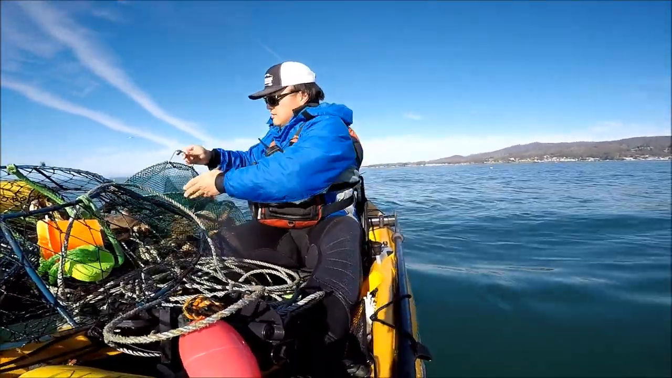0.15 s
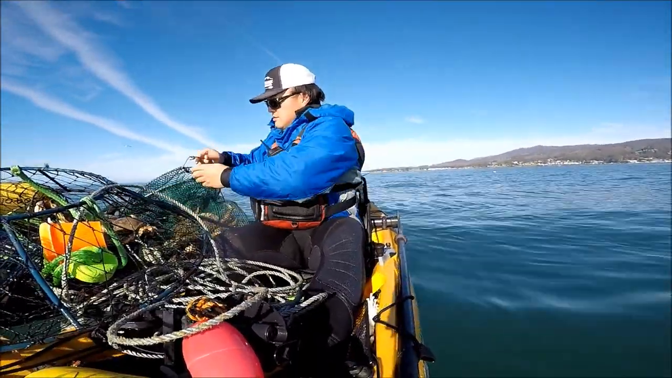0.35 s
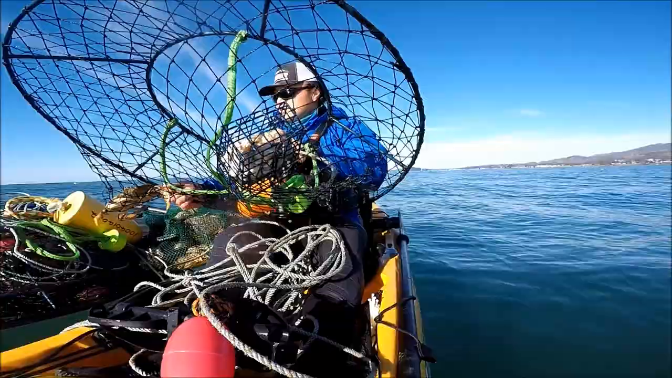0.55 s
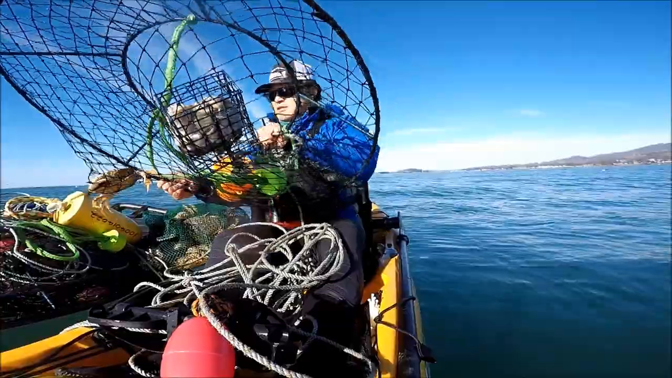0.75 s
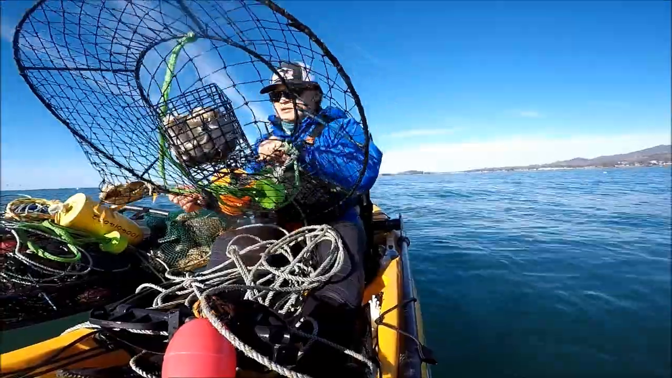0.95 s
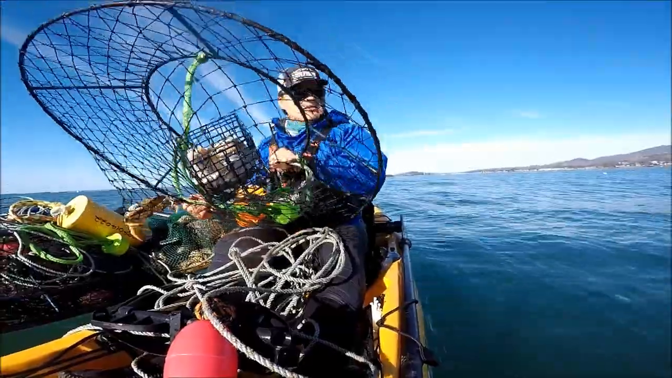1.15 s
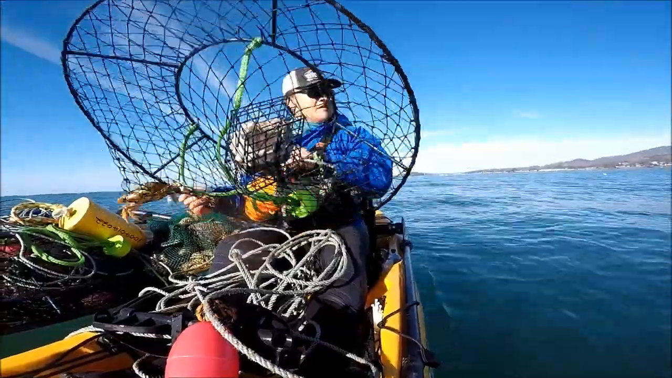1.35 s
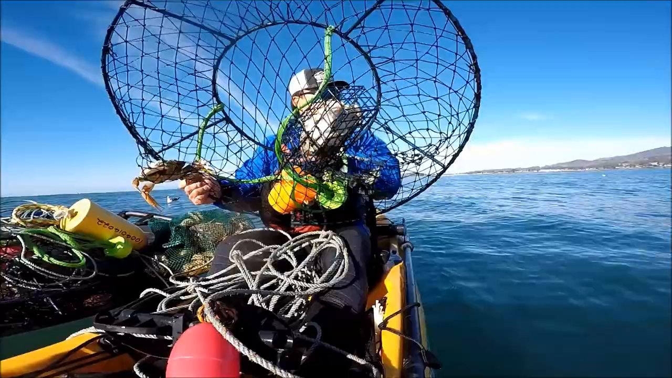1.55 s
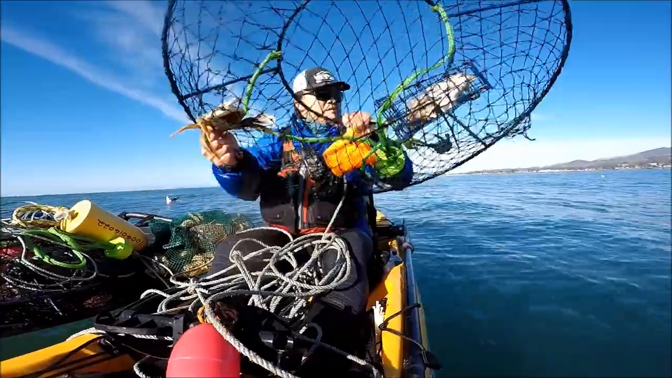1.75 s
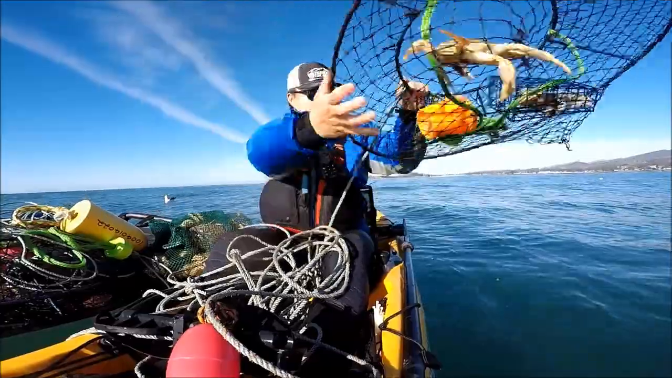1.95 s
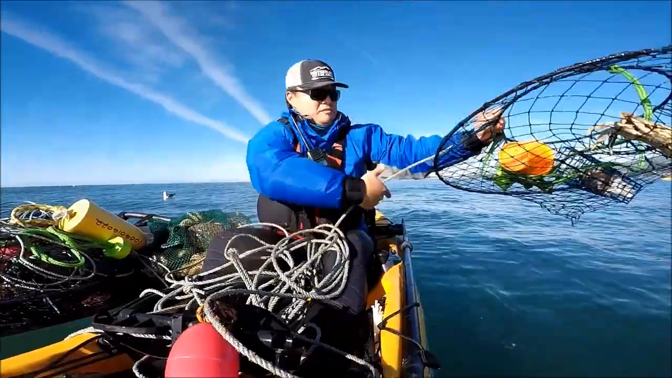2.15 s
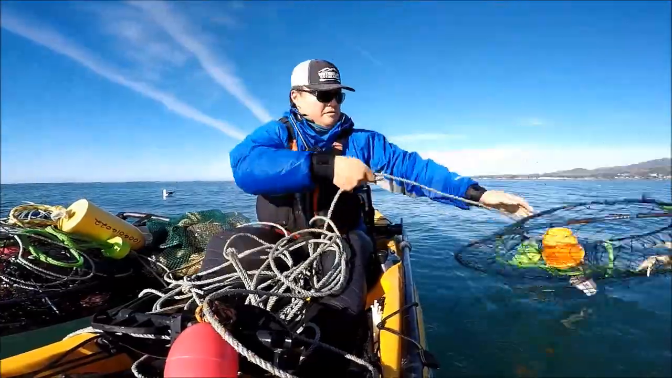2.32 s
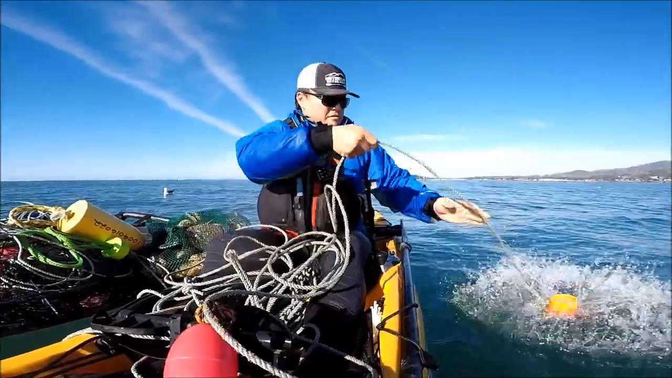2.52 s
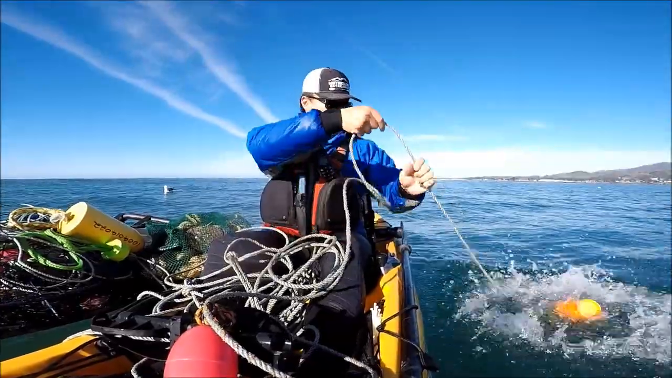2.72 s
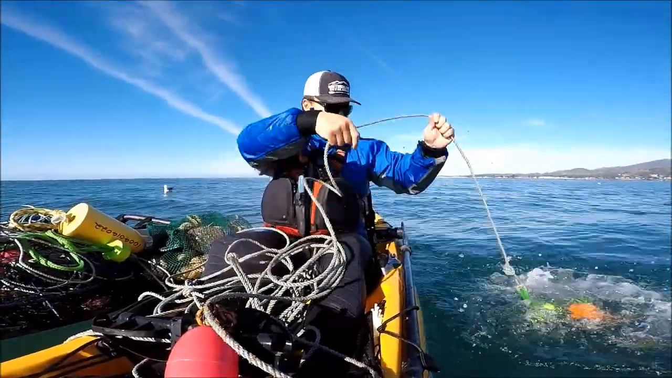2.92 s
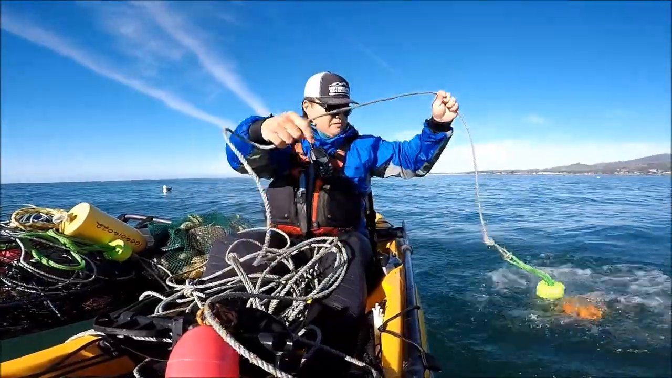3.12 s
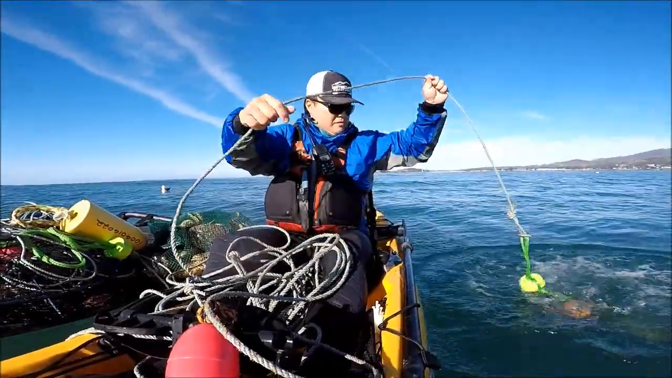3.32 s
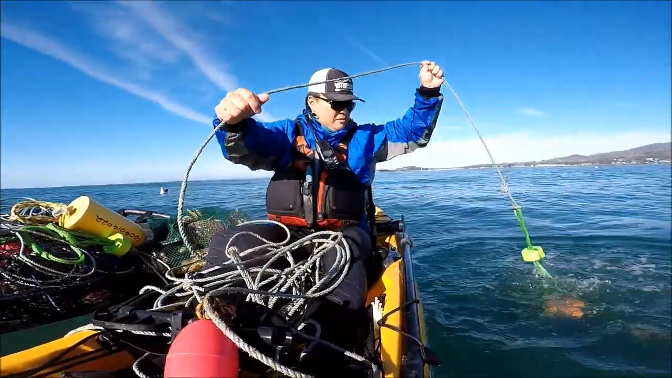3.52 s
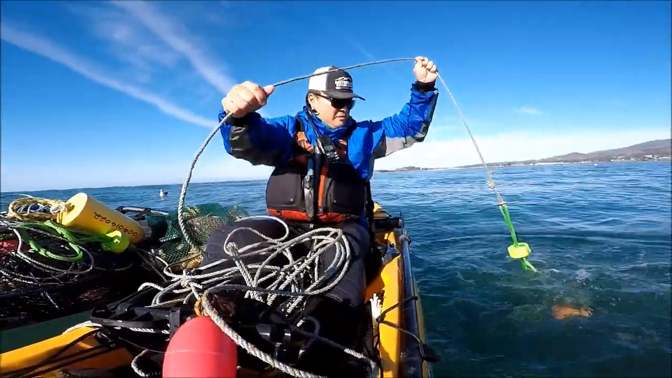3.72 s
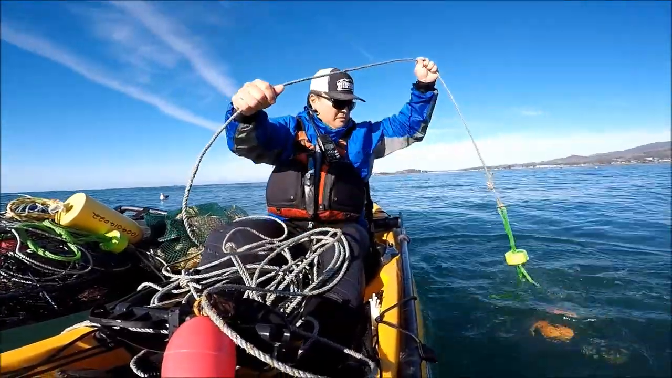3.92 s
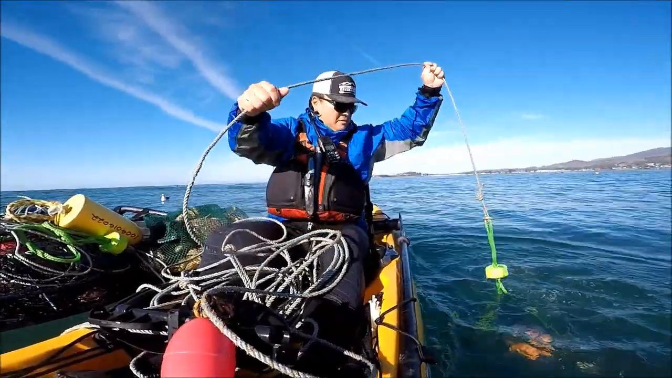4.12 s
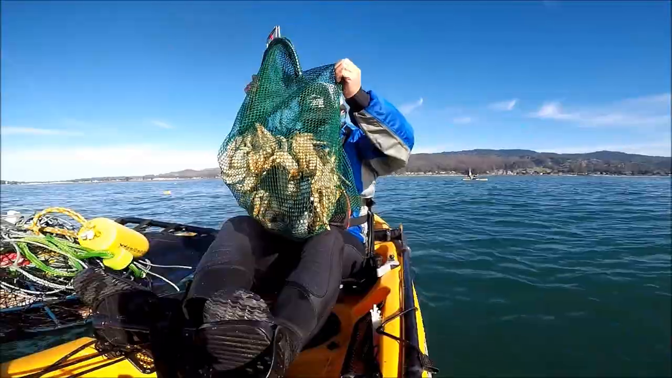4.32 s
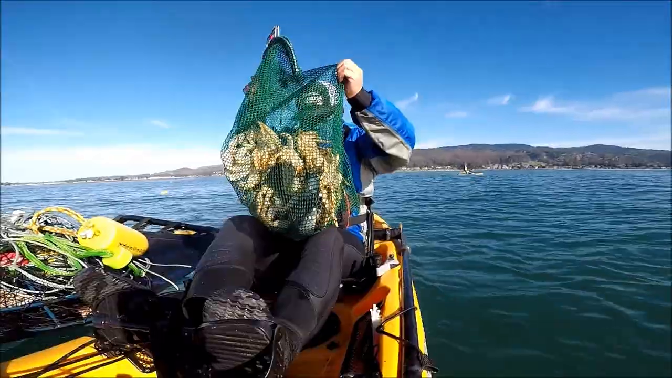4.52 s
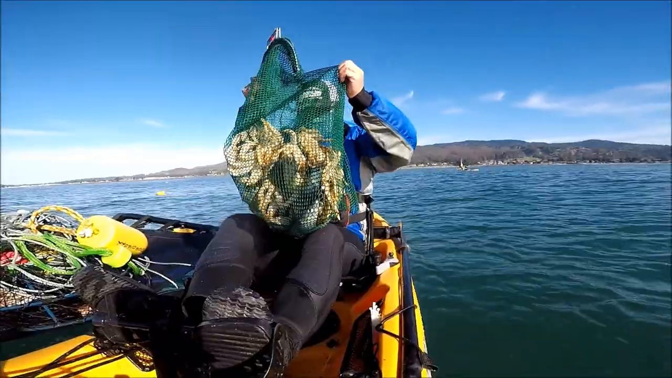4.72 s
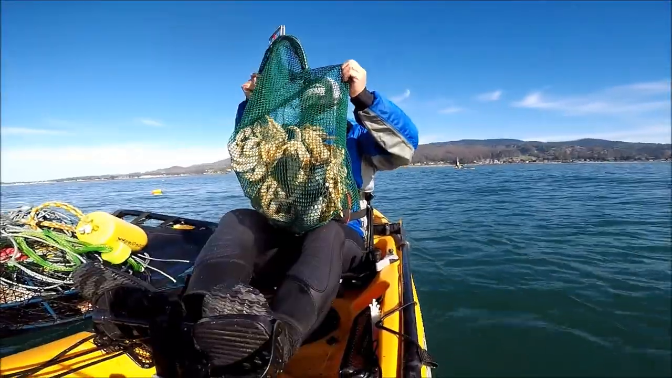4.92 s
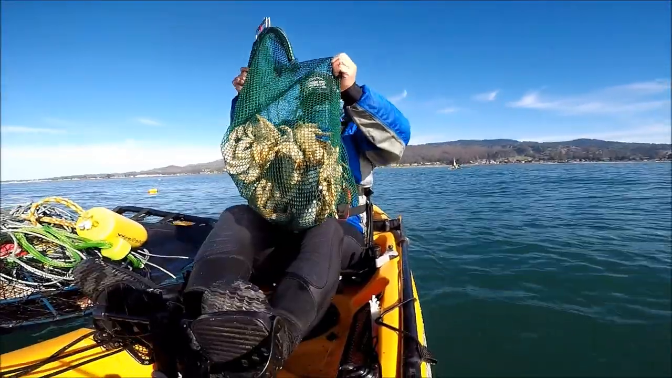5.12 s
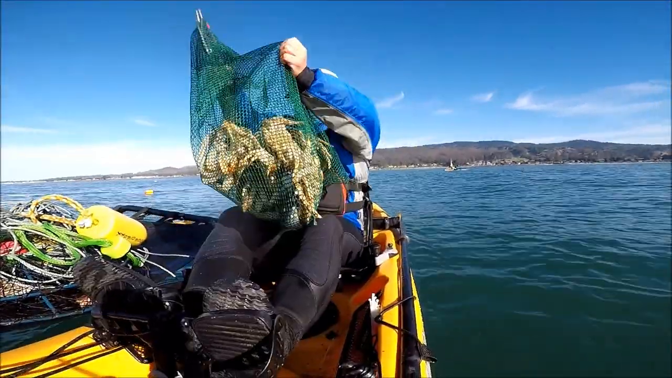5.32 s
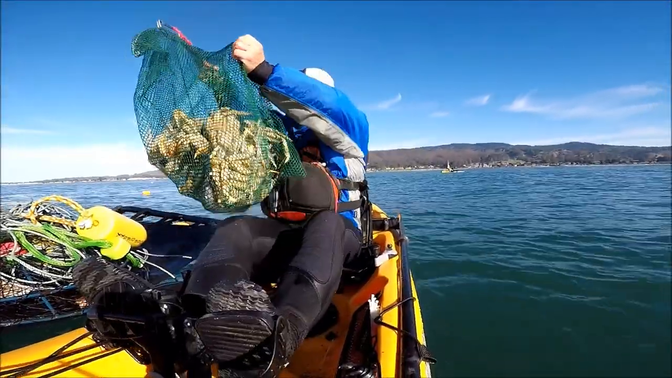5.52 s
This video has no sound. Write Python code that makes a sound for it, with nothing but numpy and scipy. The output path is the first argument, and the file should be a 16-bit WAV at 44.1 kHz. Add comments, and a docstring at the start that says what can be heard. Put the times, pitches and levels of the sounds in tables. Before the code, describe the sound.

Close outdoor microphone on a kayak at sea. Low wind buffeting opens over soft wash, with hollow hull knocks, mesh rustles and small ticks. A click cuts to calmer air and lighter handling. Midway a thrown hoop net slaps the water: bright spray, deep bubbling gurgle, quick collapse, then drops and blips. Quiet rope sounds follow; a second click brings stronger wind and a distant steady engine hum.

```python
"""Wind buffets a microphone over sea wash and hiss, while rope, mesh and gear rustle, knock and tick.
At 2.5 s a hoop net thrown from a kayak slaps the sea: noise-like spray, then a gurgling cavity of bubbles.
Drops rain back, trapping small bubbles as they land. From 4.4 s a far boat engine hums as a few steady tones.
Two clicks, at 0.7 and 4.4 s, mark the joins where the wind changes abruptly."""
import sys
import numpy as np
from scipy import signal
from scipy.io import wavfile

SR = 44100
rng = np.random.default_rng(int(sys.argv[2]) if len(sys.argv) > 2 else 0)


def wav_record(signal):
    """Record a signal, one row per channel, as 16-bit PCM in the file named by sys.argv[1]."""
    frames = np.transpose(np.atleast_2d(signal))
    bounded = np.clip(frames, -1, 1)
    # unit amplitude maps onto the largest positive 16-bit level
    quanta = np.round(bounded * 32767).astype(np.int16)
    wavfile.write(sys.argv[1], SR, quanta)


def volts(x):
    """Linear amplitude factor 10**(x/20) for a level x in dB, scalar or array-like."""
    e = np.asarray(x, float) / 20
    return 10 ** e


N = 245009  # length in samples, about 5.6 s

# In every colour table only the shape counts: the filtered sound is scaled to rms 1.
# wind on the microphone port, three stretches: (time [s], level [dB])
WIND_LEVELS = [
    [(0, -31), (.3, -25.5), (.58, -30.5), (.7, -25)],
    [(.71, -38), (.75, -51), (1.4, -55.5), (1.7, -63), (2.3, -62), (2.7, -43.5), (3.45, -46), (3.59, -49),
     (3.64, -39), (4.44, -38.5)],
    [(4.45, -36), (4.52, -30), (4.9, -28.5), (5.56, -30.5)],
]
# spectrum of the wind: (frequency [Hz], relative level [dB])
WIND_COLOUR = [(12, -61), (20, 4.5), (81, 2.5), (296, -23), (327, -25), (366, -21), (400, -46), (520, -40),
               (880, -120)]
GUST_DB, GUST_HZ = 2, 7.1  # size and fastest rate of the slower gusts
# sea wash round the hull, before heaving and the bass cut: (time [s], level [dB])
SEA_LEVELS = [(0, -33.5), (.4, -37), (1.5, -38.5), (2.4, -37), (2.66, -34), (3.3, -35), (4.3, -38),
              (4.9, -37.5), (5.15, -38.5), (5.56, -33)]
# spectrum of the wash: (frequency [Hz], relative level [dB])
SEA_COLOUR = [(53, -23), (90, -47), (128, 2), (195, 1), (268, -6), (345, -8), (437, -11), (1050, -24),
              (1160, -26.5), (4020, -40), (5000, -41.5), (6500, -47), (11000, -120)]
WASH_CUT_HZ = 135.8  # the wash is cut steeply below this
# spectrum of the microphone's own hiss: (frequency [Hz], relative level [dB])
HISS_COLOUR = [(1470, -24), (2500, -31), (4110, 1), (6550, 1.5), (8660, 7.5), (10300, 6), (14700, -8.5),
               (15600, -28), (16000, -68)]
HISS_DB = -62.5

# strokes of mesh, rope and sleeve rubbing, scrapes before their flutter:
# (start [s], length [s], peak rub level [dB], peak scrape level [dB])
STROKES = [(0, 0.027, -46.5, -62), (.11, 0.14, -51.5, -58), (0.228, 0.17, -53.5, -63),
           (0.503, 0.11, -52.5, -62), (0.576, 0.14, -50, -55.5), (0.696, 0.1, -53.5, -60),
           (0.792, 0.09, -58, -64), (1.046, 0.27, -52.5, -60.5), (1.3, 0.5, -61.5, -69),
           (1.58, 0.36, -52.5, -62.5), (1.795, 0.49, -51, -63), (2.21, 0.28, -52, -57.5),
           (3.62, 0.91, -57.5, -66.5), (4.3, 1, -59, -74), (4.904, 0.51, -66, -78), (5.312, .15, -50, -62)]
# spectrum of the rubbing: (frequency [Hz], relative level [dB])
RUSTLE_COLOUR = [(590, -14.5), (1000, -1.5), (1150, -8.5), (1450, -5.5), (1760, -2), (2000, -6.5),
                 (3140, -8.5), (3890, -12.5), (5290, -24.5), (8710, -18), (15000, -31.5)]
STROKE_PEAK = 0.64  # exponent: under 1 the stroke peaks early
SCRAPE_HZ, SCRAPE_Q = 3940, 5.1  # centre and sharpness of the narrow scrape

# gear knocking on the hull: (time [s], peak level [dB], favoured pitch [Hz], ring time factor [times])
KNOCKS = [(.05, -31, 424, 1), (0.109, -29.5, 430, 1.5), (0.277, -19.5, 473, 0.96), (.3, -21.5, 350, 0.87),
          (0.627, -26.5, 454, 0.91), (.653, -27, 458, 1.1), (.777, -26, 210, 0.61), (1.701, -24.5, 210, 2),
          (3.628, -17.5, 717, 1.4), (3.645, -19, 265, 0.63), (4.79, -27.5, 320, 0.66),
          (4.79, -34.5, 1020, 0.57), (5.198, -35, 460, 0.56), (5.517, -40, 1100, 0.46),
          (5.532, -23.5, 298, .6), (5.528, -19, 750, 0.45)]
# ringing modes of the hull, before the knock's own settings:
# (frequency [Hz], relative level [dB], time to fade by 60 dB [s])
HULL_MODES = [(210, 2.7, 0.097), (293, 4, 0.082), (366, -5, 0.12), (460, -3, 0.082), (575, 1, 0.046),
              (750, -13.5, 0.045), (970, -4.5, 0.033), (1195, -10, 0.12), (1430, -1, .04)]

# ticks of rope, mesh and drops, levels before rise and fade:
# (time [s], low band level [dB], low band pitch [Hz], high band level [dB], top treble level [dB])
TICKS = [(0.1255, -36.5, 1530, -47, -56), (0.263, -45, 2200, -42, -48), (0.2738, -28.5, 2130, -28, -28),
         (0.2873, -32, 1430, -33, -39), (.302, -44, 2100, -47, -41), (0.5167, -42, 1310, -46, -55),
         (0.713, -42, 2900, -46, -56), (.7254, -38, 2520, -35, -48), (0.829, -46, 2640, -56, -60),
         (.971, -41, 2660, -54, -58), (1.074, -43, 2200, -56, -58), (1.094, -42, 3150, -57, -58),
         (1.6503, -57, 1390, -50, -51), (1.704, -38, 1820, -45, -44), (1.72, -42.5, 1460, -35, -44),
         (1.738, -40, 2870, -36, -54), (1.846, -30, 2550, -30, -44), (2.096, -40, 2450, -44, -60),
         (2.252, -45, 1610, -46, -61), (2.698, -25, 2100, -34, -46), (2.7786, -29, 2080, -47, -47),
         (2.9143, -31, 1890, -34, -42), (3.1092, -45, 1470, -38, -54), (3.1313, -38, 1790, -34, -43),
         (3.2227, -39, 1740, -42, -44), (3.3553, -40, 2250, -46, -51), (3.3936, -51, 1750, -49, -59),
         (3.446, -46, 1500, -46, -58), (3.455, -36, 2270, -32, -56), (3.616, -33.5, 1900, -46, -56),
         (3.626, -34.5, 3040, -56, -52), (3.654, -44, 2300, -48, -58), (4.6403, -36.5, 2100, -41, -47),
         (4.9096, -41.5, 2400, -49, -61), (5.1094, -52, 1300, -47, -63), (5.297, -38, 1800, -38.5, -53),
         (5.4404, -46, 1680, -43, -58), (5.512, -41, 2930, -50, -60), (5.5155, -33.5, 1500, -49, -58),
         (5.527, -37.5, 2390, -37, -50)]
TICK_HIGH_HZ, TICK_RISE_S = 3600, 0.0019
TICK_T60_S, TICK_HIGH_T60_S = 0.047, 0.033  # time to fade by 60 dB: low band, the rest

# clicks at the two joins: (time [s], peak level [dB])
JOIN_CLICKS = [(0.7073, -24), (4.4447, -24)]

# the hoop slaps the surface, rim first, then flat:
# (time [s], spray level [dB], gulp level [dB], rise [s], time to fade by 60 dB [s])
SLAPS = [(2.472, -22.5, -28.5, 0.0088, 0.46), (2.54, -16.5, -23, 0.0028, 0.077)]
# spectrum of the spray: (frequency [Hz], relative level [dB])
SPRAY_COLOUR = [(530, -37), (900, -1.5), (1130, -5.5), (1470, -13.5), (1950, -2.5), (2450, -10.5),
                (3510, -11), (3960, -6), (4520, -18.5), (5820, -23), (8660, -17), (10000, -27),
                (12300, -26.5), (14700, -30), (16000, -55)]
ROAR_PATCHY_DB, DROPS_PATCHY_DB = 1.5, 4  # the roar is dense, the falling drops land in bursts
# the cavity under the net stands open, then collapses
OPEN_S, SHUT_S, OPENING_S, COLLAPSE_DB_PER_S = 2.556, 2.705, 0.0067, 303
CAVITY_DB, CAVITY_SINK_DB_PER_S, ROAR_DB = -17, 38, -29.5
# spectrum of the cavity's gurgle: (frequency [Hz], relative level [dB])
CAVITY_COLOUR = [(120, -54), (200, 4.5), (226, -14), (586, -4.5), (701, -10), (748, -6.5), (805, -12.5),
                 (1400, -21), (1820, -46), (3080, -120)]
# single bubbles; the pitch climbs by the rise in the first 0.26 of the fade, then a tenth of it more:
# (time [s], level before onset and fade [dB], start pitch [Hz], rise [octaves], time to fade by 60 dB [s])
BUBBLES = [(2.566, -12, 150, .1, .12), (2.588, -13, 480, .1, .06), (2.619, -14, 450, .45, .06),
           (2.677, -9, 540, .1, .045), (2.702, -16, 380, .1, .05), (2.971, -26, 3750, .2, .018),
           (3.068, -28, 500, 1.05, .11), (3.175, -34, 750, .2, .04), (3.281, -29.5, 650, .2, .05),
           (3.42, -36, 1000, .1, .04), (3.43, -33, 430, .5, .08), (4.206, -33, 1100, .85, .04)]
# drops raining back: (time [s], spray level [dB], bubbling level [dB])
FALLBACK = [(2.7, -34.5, -27), (2.8, -39.5, -38), (2.98, -39.5, -39.5), (3.1, -48, -56),
            (3.3, -51.5, -59.5), (3.7, -53, -63), (3.85, -63, -62)]

# multiples of the engine's firing rate: (multiple [times], relative level [dB])
ENGINE_ORDERS = [(.5, -17), (1, 1.5), (1.5, -16), (2, -18.5)]
# far engine: steady firing, slowly nearer, its pitch easing off at the end
ENGINE_FROM_S, FIRING_HZ, ENGINE_DB, NEARING_DB_PER_S = 4.445, 130.3, -33.5, 4
EASE_S, SAG_HZ_PER_S = 5.45, 50


def evened(x):
    """Scales a sound to rms 1."""
    return x / np.sqrt(np.mean(x ** 2) + 1e-20)


def after(s):
    """Seconds since time s, zero before it."""
    return np.maximum(np.arange(N) / SR - s, 0)


def level(tables, column=1):
    """Gain along the scene from tables of levels; silent outside each, held from 5.52 s on."""
    t = np.minimum(np.arange(N) / SR, 5.52)
    gain = np.zeros(N)
    for table in tables:
        rows = np.array(table)
        gain += volts(np.interp(t, rows[:, 0], rows[:, column], -150, -150))
    return gain


def add(mix, s, sound):
    """Mixes a sound in at time s."""
    part = mix[round(s * SR):][:len(sound)]
    part += sound[:len(part)]


def coloured(x, colour):
    """Filters x by a spectrum, causally, so that clicks stay sharp at the front; rms 1."""
    hz, db = np.transpose(colour)
    grid_hz = np.fft.rfftfreq(16384, 1 / SR)
    log_gain = np.log(volts(np.interp(np.log(grid_hz + 1), np.log(hz), db)))
    log_gain = np.r_[log_gain, log_gain[-2:0:-1]]
    # the minimum-phase filter puts its energy as early as it can
    spectrum = np.exp(np.conj(signal.hilbert(log_gain)))
    taps = np.fft.ifft(spectrum).real[:8192]
    return evened(signal.oaconvolve(x, taps)[:N])


def lumps(hz):
    """Slow random drift of rms 1: noise kept below about hz."""
    return evened(signal.lfilter(*signal.butter(2, hz, fs=SR), rng.standard_normal(N)))


def crackle(per_s, spread_db):
    """Sparse clicks of random sign, a few of them large; rms 1."""
    size = volts(spread_db * np.minimum(rng.exponential(1, N), 4))
    sign = rng.choice([-1., 1.], N)
    happens = rng.random(N) < per_s / SR
    return evened(size * sign * happens)


def peaked(x, hz, q):
    """Lets x ring in one band: hz is its centre, q its sharpness."""
    return signal.lfilter(*signal.iirpeak(hz, q, SR), x)


def bubble(hz, rise, t60):
    """A ringing air pocket whose pitch climbs as it nears the surface."""
    t = np.arange(0, t60, 1 / SR)
    octaves = rise * np.minimum(t / (0.26 * t60), 1.1)
    turns = np.cumsum(hz * 2 ** octaves) / SR
    onset = 1 - np.exp(-t * hz / 0.4)
    fade = volts(-60 * (t / t60) ** 1.31)
    return onset * fade * np.sin(2 * np.pi * turns)


def swarm(low_hz, high_hz, per_s, rise, turns, tilt):
    """Bubbles of sixteen sizes, each size on its own random beat; a bubble rings for some turns."""
    total = np.zeros(N)
    for hz in np.geomspace(low_hz, high_hz, num=16):
        one_size = signal.oaconvolve(crackle(per_s, 2.63), bubble(hz, rise, turns / hz))[:N]
        total += one_size * (hz / low_hz) ** tilt
    return evened(total)


def wind():
    """Lumpy buffeting: noise whose loudness drifts at a fast and a slow rate."""
    buffet_db = 0.99 * lumps(18) + GUST_DB * lumps(GUST_HZ)
    return level(WIND_LEVELS) * coloured(rng.standard_normal(N) * volts(buffet_db), WIND_COLOUR)


def sea_wash():
    """Heaving water: noise whose bass and treble swell apart."""
    wash = coloured(rng.standard_normal(N), SEA_COLOUR)
    bass = signal.lfilter(*signal.butter(2, 600, fs=SR), wash)
    treble = wash - bass
    wash = bass * volts(0.71 * lumps(14.7)) + treble * volts(1.6 * lumps(10.7))
    bass_cut = signal.butter(8, WASH_CUT_HZ, "highpass", fs=SR, output="sos")
    return level([SEA_LEVELS]) * signal.sosfilt(bass_cut, wash)


def microphone_hiss():
    """The microphone's own steady noise."""
    return volts(HISS_DB) * coloured(rng.standard_normal(N), HISS_COLOUR)


def rustle():
    """Fine slips of fibre on fibre, in clumps; each stroke swells and fades, with a narrow scrape."""
    slips = crackle(2000, 4.7) * volts(1.7 * lumps(27)) + 0.92 * rng.standard_normal(N)
    swells = []
    for start, length, *_ in STROKES:
        progress = np.minimum(after(start) / length, 1)
        swells.append(np.sin(np.pi * progress ** STROKE_PEAK) ** 2)
    # the powers of overlapping strokes add up
    power = volts(np.transpose(STROKES)[2:]) ** 2 @ np.array(swells)
    rub_gain, scrape_gain = np.sqrt(power)
    scrape = evened(peaked(peaked(slips, SCRAPE_HZ, SCRAPE_Q), SCRAPE_HZ, SCRAPE_Q))
    flutter = volts(2.9 * lumps(25))
    return rub_gain * coloured(slips, RUSTLE_COLOUR) + scrape_gain * flutter * scrape


def knocks():
    """Gear strikes the hull, which rings in several fading modes."""
    out, t = np.zeros(N), np.arange(6000) / SR
    for s, db, near_hz, ring_factor in KNOCKS:
        ring = np.zeros(len(t))
        for hz, mode_db, t60 in HULL_MODES:
            # the struck spot favours the modes near one pitch
            away_db = 23.2 * abs(np.log2(hz / near_hz))
            fade_db = 60 * t / t60 / ring_factor
            ring += volts(mode_db - away_db - fade_db) * np.sin(2 * np.pi * (hz * t + rng.random()))
        ring *= 1 - np.exp(-t / 0.00072)
        add(out, s, volts(db) * ring / abs(ring).max())
    return out


def ticks():
    """Rope, mesh and drops tick: noise bursts in two ringing bands, with a fizz of top treble."""
    out, t = np.zeros(N), np.arange(6000) / SR
    fizz_band = signal.butter(2, [5500, 10500], "bandpass", fs=SR)
    rise = 1 - np.exp(-(t / TICK_RISE_S) ** 2)
    for s, low_db, low_hz, high_db, top_db in TICKS:
        noise = rng.standard_normal(len(t))
        low = evened(peaked(peaked(noise, low_hz, 2.5), low_hz, 3.5))
        high = evened(peaked(peaked(noise, TICK_HIGH_HZ, 2.5), TICK_HIGH_HZ, 3.5))
        top = evened(signal.lfilter(*fizz_band, noise))
        burst = volts(low_db - 60 * t / TICK_T60_S) * low
        burst += volts(-60 * t / TICK_HIGH_T60_S) * (volts(high_db) * high + volts(top_db) * top)
        add(out, s, burst * rise)
    return out


def join_clicks():
    """A bare click at each join: a jump that dies away at once."""
    out, t = np.zeros(N), np.arange(200) / SR
    for s, db in JOIN_CLICKS:
        add(out, s, volts(db) * np.exp(-t / 0.00038))
    return out


def slap_gain(column):
    """Loudness of the slaps: each rises fast as the hoop hits, then fades."""
    gain = np.zeros(N)
    for row in SLAPS:
        s, _, _, rise, t60 = row
        gain += volts(row[column]) * (1 - np.exp(-(after(s) / rise) ** 2)) * volts(-60 * after(s) / t60)
    return gain


def cavity_gain():
    """The cavity under the net opens quickly, stays open, then collapses."""
    return np.minimum(after(OPEN_S) / OPENING_S, 1) * volts(-COLLAPSE_DB_PER_S * after(SHUT_S))


def spray():
    """Water bursts into drops: tiny bubbles, clicks and noise, patchier once the drops rain back."""
    patchy_db = np.where(after(SHUT_S) > 0, DROPS_PATCHY_DB, ROAR_PATCHY_DB)
    spatter = swarm(995, 13560, per_s=150, rise=0.24, turns=13.4, tilt=0.95)
    drops = (1.04 * spatter + 0.43 * crackle(1700, 1.3)) * volts(patchy_db * lumps(47))
    drops += 1.26 * rng.standard_normal(N)
    gain = slap_gain(column=1) + volts(ROAR_DB) * cavity_gain()
    return np.maximum(gain, level([FALLBACK])) * coloured(drops, SPRAY_COLOUR)


def gurgling_cavity():
    """The cavity under the net breaks into large bubbles, its gurgle sinking in level."""
    churn = swarm(222, 1320, per_s=240, rise=0.13, turns=11.0, tilt=0.9)
    open_gain = cavity_gain() * volts(CAVITY_DB - CAVITY_SINK_DB_PER_S * after(OPEN_S))
    return (slap_gain(column=2) + open_gain) * coloured(churn, CAVITY_COLOUR)


def single_bubbles():
    """Bubbles that stand out one by one."""
    out = np.zeros(N)
    for s, db, hz, rise, t60 in BUBBLES:
        add(out, s, volts(db) * bubble(hz, rise, t60))
    return out


def trapped_bubbles():
    """Falling drops trap small bubbles of air, which ring."""
    return level([FALLBACK], column=2) * swarm(587, 3650, per_s=50, rise=0.11, turns=11.0, tilt=-0.29)


def engine():
    """Low tones at multiples of the firing rate, each wavering over the water."""
    turns = np.cumsum(FIRING_HZ - SAG_HZ_PER_S * after(EASE_S)) / SR
    tone = np.zeros(N)
    for multiple, db in ENGINE_ORDERS:
        tone += volts(db + 2.8 * lumps(16)) * np.sin(2 * np.pi * multiple * turns)
    t = after(ENGINE_FROM_S)
    fade_in = np.minimum(t / 0.048, 1)
    return np.sqrt(2) * fade_in * volts(ENGINE_DB + NEARING_DB_PER_S * t) * tone


def scene():
    """All sources reach one microphone, alike in both channels."""
    mix = wind() + sea_wash() + microphone_hiss()
    mix += rustle() + knocks() + ticks() + join_clicks()
    mix += spray() + gurgling_cavity() + single_bubbles() + trapped_bubbles()
    mix += engine()
    return np.tile(mix, (2, 1))


def top_cut(x):
    """Nothing passes above the cut-off."""
    return signal.sosfilt(signal.butter(12, 16430, fs=SR, output="sos"), x)


def record(dry):
    """Mono, except the top treble, which leans right and flickers between the channels; then a treble cut."""
    top = signal.oaconvolve(dry[0], signal.firwin(255, 11500, pass_zero=False, fs=SR), "same")
    side = (.65 * lumps(150) - .17) * top
    stereo = dry + np.array([side, -side])
    treble_cut = signal.firwin(255, 15500, fs=SR)[None]
    mix = signal.oaconvolve(stereo, treble_cut, "same")
    return top_cut(mix)


dry = scene()
out = record(dry)
wav_record(out)
```